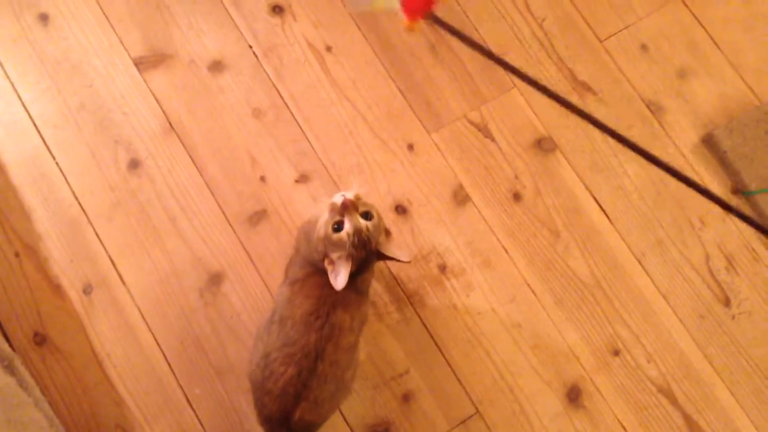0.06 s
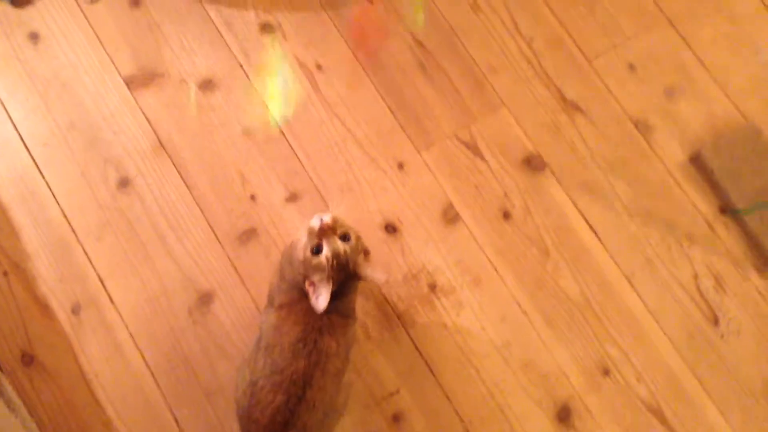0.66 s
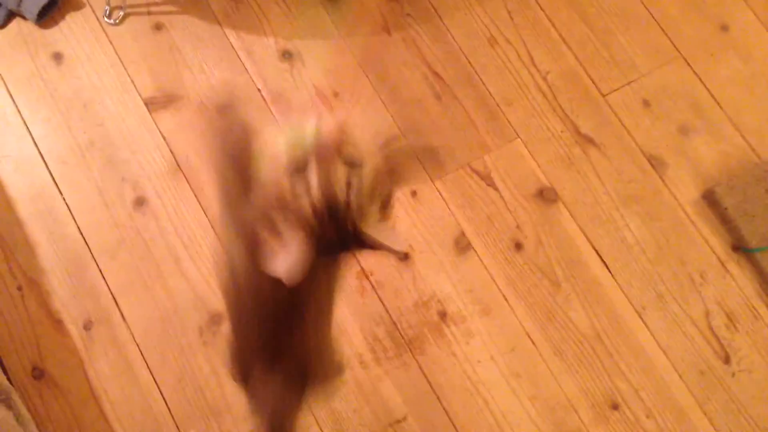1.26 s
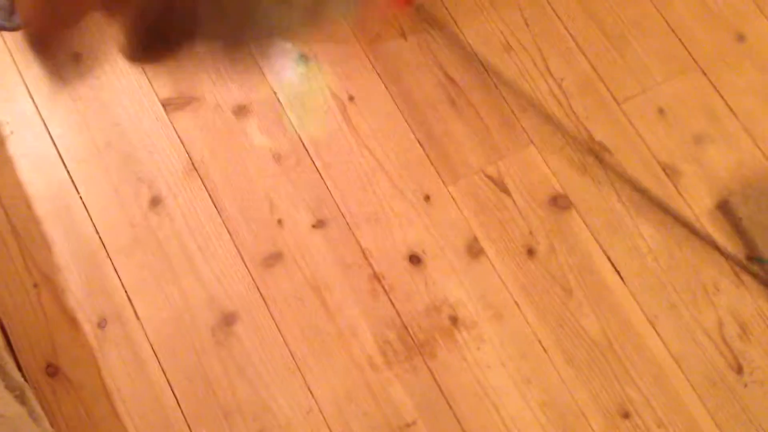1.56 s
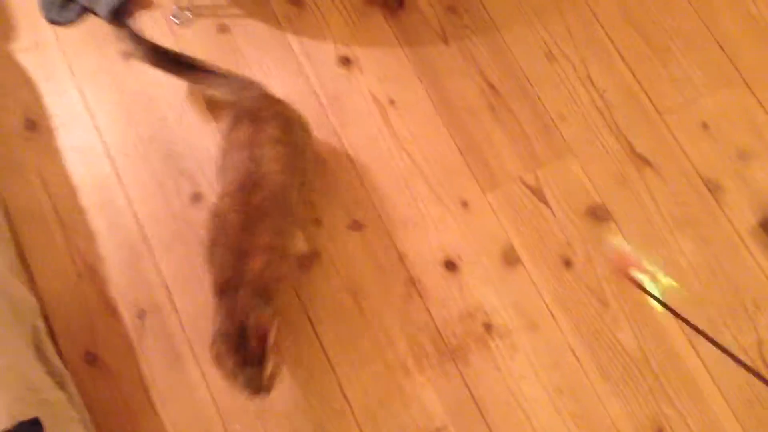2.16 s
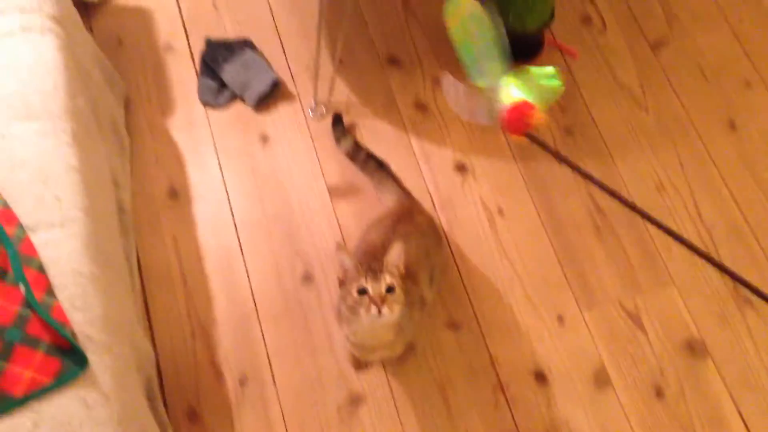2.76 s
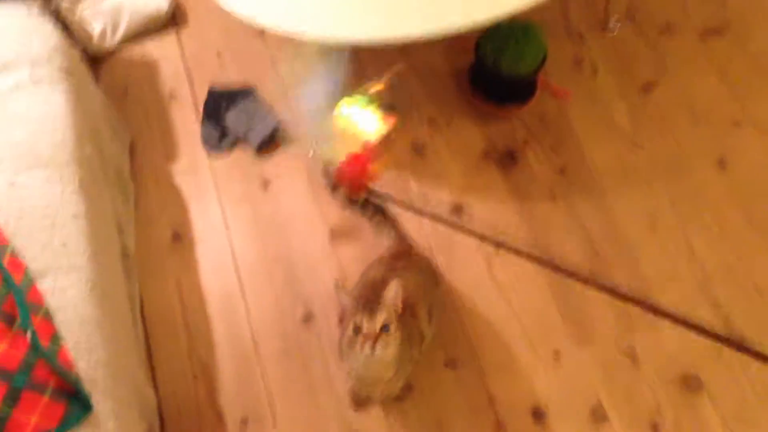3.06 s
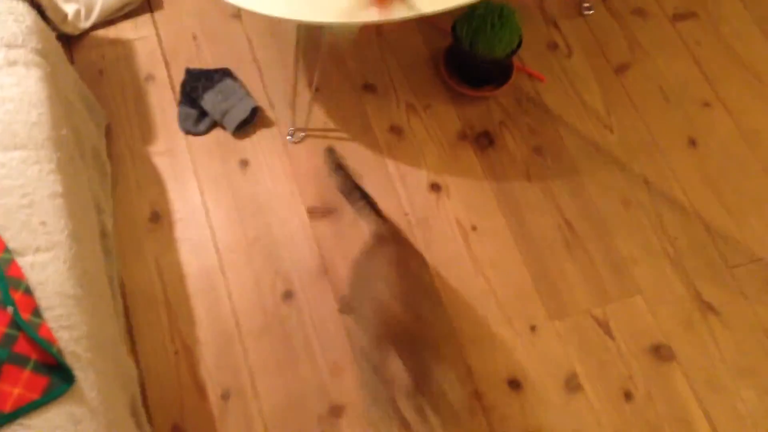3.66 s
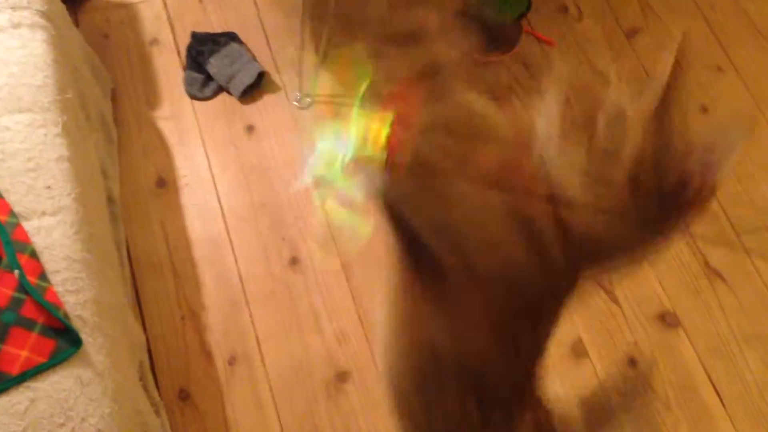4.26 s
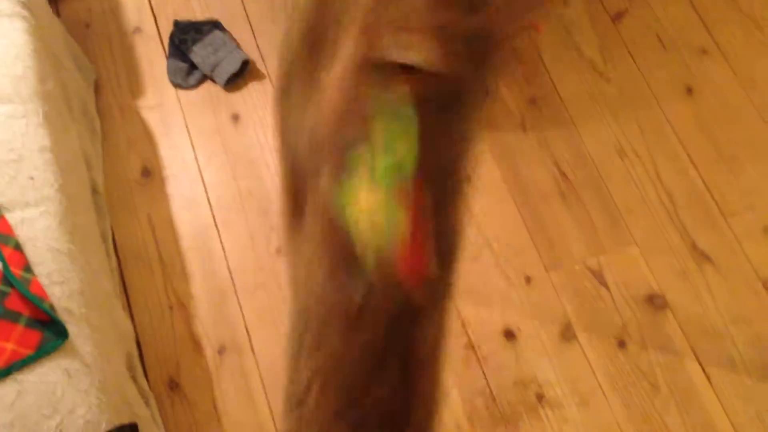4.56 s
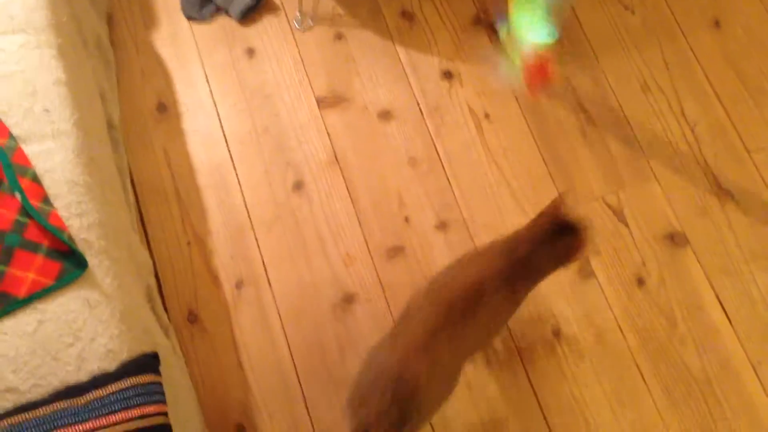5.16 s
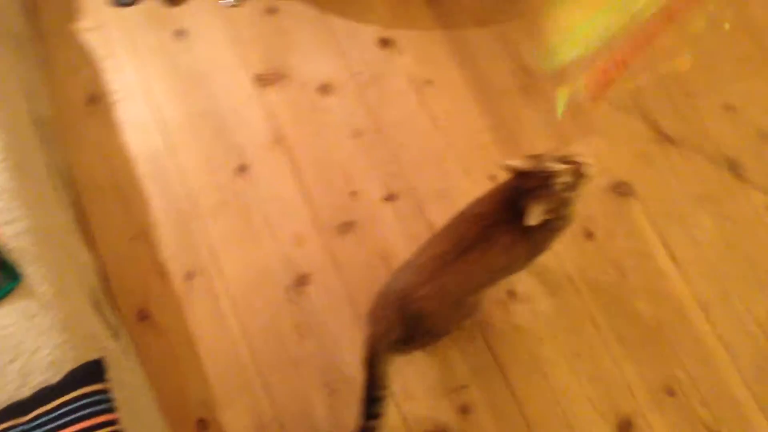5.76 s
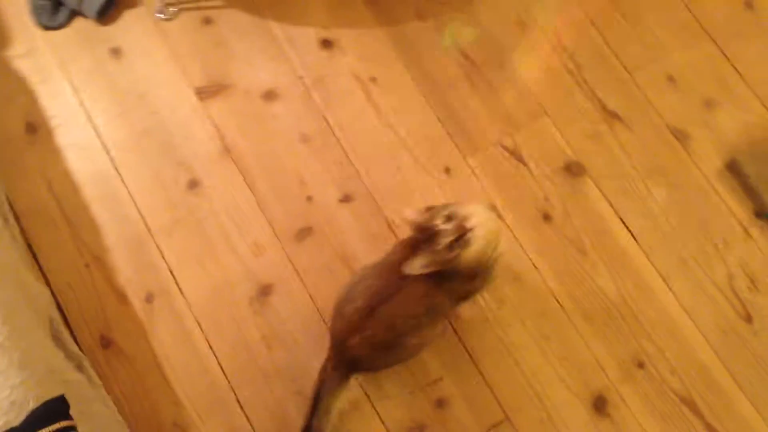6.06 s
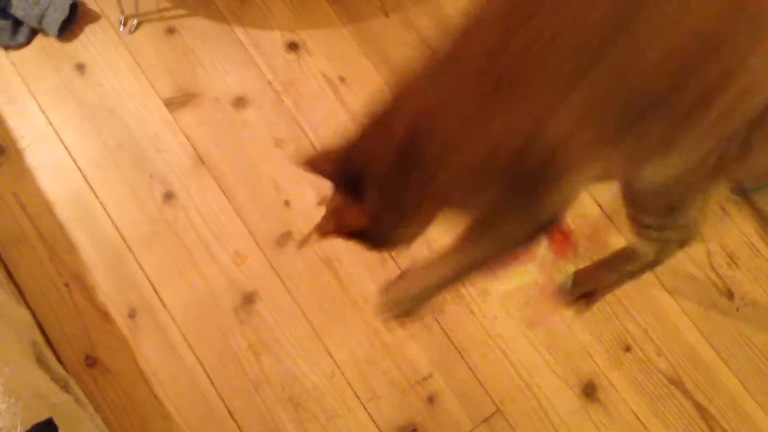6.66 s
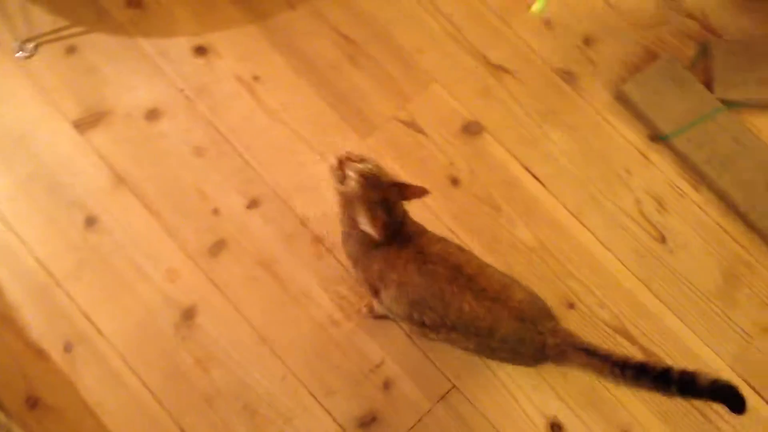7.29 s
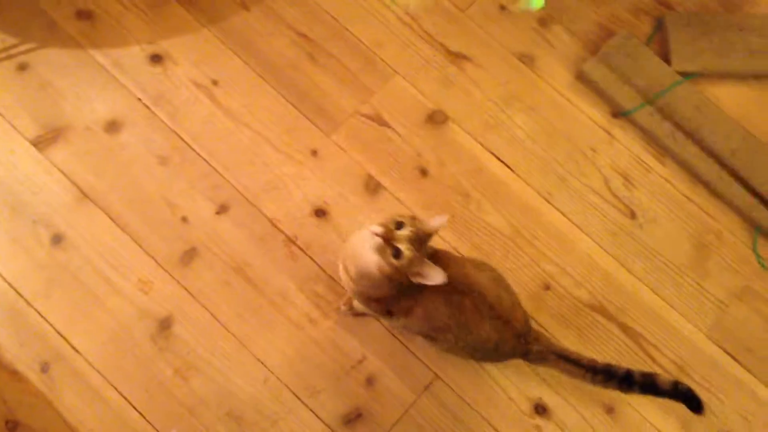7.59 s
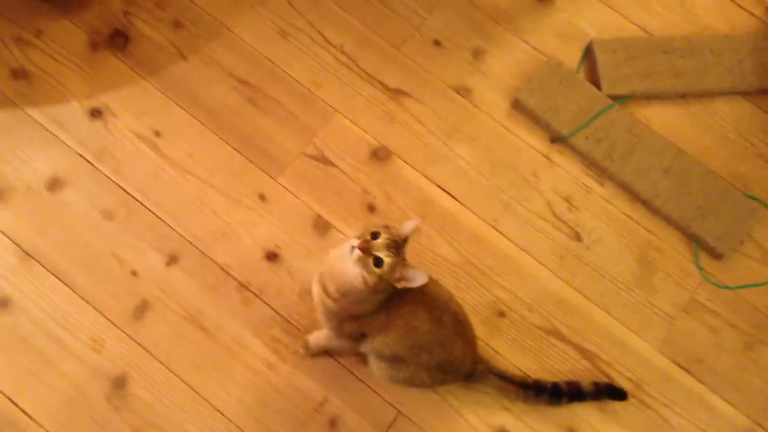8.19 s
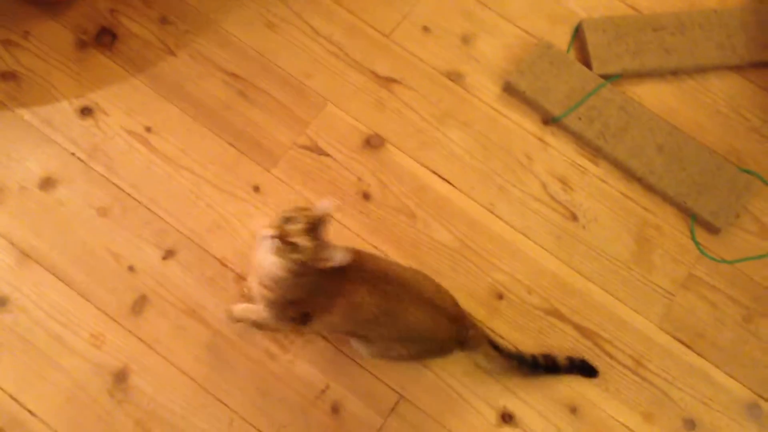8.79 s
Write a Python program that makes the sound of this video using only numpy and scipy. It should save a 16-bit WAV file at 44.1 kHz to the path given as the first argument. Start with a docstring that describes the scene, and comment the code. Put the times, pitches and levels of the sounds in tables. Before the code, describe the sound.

A cat swats at a rustling wand toy in crackly bursts, thumping down onto floorboards three times in a quiet room.

```python
"""A small, faintly humming room with a plank floor; one microphone, close to a cat and a wand toy.
Half a second in, the wand starts to flick: its foil feathers brush, crinkle and snap at each turn.
Near 1.4 s the cat swats them in mid-air with a loud crackle and dull knocks of the toy, then lands
at 2 s, paw after paw, on the booming boards. Two more swats end in landings at 4.8 and 6.9 s.
A last flurry from 8.2 s passes near enough to stir the air at the microphone."""
import sys
import numpy as np
from scipy import signal
from scipy.fft import rfft, irfft, next_fast_len
from scipy.io import wavfile

SR = 44100
rng = np.random.default_rng(int(sys.argv[2]) if len(sys.argv) > 2 else 0)


def generate_wav(signal):
    """Clip the signal to [-1, 1] and save it as 16-bit WAV at the path in sys.argv[1]."""
    frames = np.transpose(np.atleast_2d(signal))
    scaled = np.clip(frames, -1, 1) * 32767
    pcm = np.round(scaled).astype(np.int16)
    wavfile.write(sys.argv[1], SR, pcm)


N = 398223


def amp(db):
    """Decibels to gain."""
    return 10 ** (np.asarray(db) / 20)


def rms(x):
    """Root mean square of a signal."""
    return np.sqrt(np.mean(x ** 2) + 1e-20)


def unit(x):
    """Scale to rms 1."""
    return x / rms(x)


def clock(size):
    """Sample times in seconds."""
    return np.arange(size) / SR


def along(points, hz):
    """(Hz, value) points read on a log frequency axis."""
    point_hz, values = np.transpose(points)
    return np.interp(np.log(hz + 1), np.log(point_hz), values)


def filtered(x, gain):
    """x through the minimum-phase filter that has this gain over frequency."""
    size = 2 * next_fast_len(len(x) // 2 + 4096)
    hz = np.fft.rfftfreq(size, 1 / SR)
    cepstrum = irfft(np.log(np.maximum(gain(hz), 1e-6)))
    cepstrum[1:size // 2] *= 2  # folding onto positive time makes the filter causal
    cepstrum[size // 2 + 1:] = 0
    return irfft(rfft(x, size) * np.exp(rfft(cepstrum)))[:len(x)]


def cushion(hz, hard_hz):
    """Low-pass gain: a padded contact passes little above its hardness frequency."""
    return 1 / np.sqrt(1 + (hz / hard_hz) ** 4)


def add(track, s, sound):
    """Mix a sound into a track from time s on."""
    start = max(round(s * SR), 0)
    part = sound[:max(N - start, 0)]
    track[start:start + len(part)] += part


# The still room at the microphone. Each row: frequency in Hz, relative level in dB.
ROOM_TONE_SPECTRUM = [(15, -54), (25, -23), (79, -12), (119, -16), (140, -8), (160, -3), (281, -8),
                      (482, -13), (871, -19.5), (997, -18), (1490, -24.5), (1750, -25), (2630, -27.5),
                      (14300, -30.5), (15500, -34)]
def room_tone(air_db=-61.5, drone_db=-67, drone_hz=163):
    """Low room noise and microphone hiss, with a narrow drone at a room resonance."""
    air = filtered(rng.standard_normal(N), lambda hz: amp(along(ROOM_TONE_SPECTRUM, hz)))
    drone = filtered(rng.standard_normal(N), lambda hz: 1 / (1 + ((hz - drone_hz) / 16) ** 2))
    return amp(air_db) * unit(air) + amp(drone_db) * unit(drone)


def creases(size, per_second, spread_db):
    """Foil buckles in tiny clicks at random moments and of uneven strength; rms 1."""
    happens = rng.random(size) < per_second / SR
    strength = amp(spread_db * np.clip(rng.standard_normal(size), -2, 2))
    return unit(happens * strength * rng.choice([-1, 1], size))


# The foil's tone from close by. Each row: frequency in Hz, relative level in dB.
FOIL_SPECTRUM = [(40, -7.5), (150, -8.5), (400, -8.5), (750, -10.5), (1050, -6.5), (1400, 0.5), (1900, 3),
                 (2350, 1.5), (3500, -2), (4800, 3), (6500, 2), (8500, -2.5), (12000, -5.5), (15500, -12.5)]
def foil(clicks, bright_db, facet_hz=4500, facet_db=0):
    """The foil radiates the clicks; sharp folds add treble and a flat facet can ring."""
    def colour(hz):
        treble = 1 / (1 + (6000 / (hz + 1)) ** 3)
        facet = 1 / (1 + ((hz - facet_hz) / (0.12 * facet_hz)) ** 2)
        return unit(amp(along(FOIL_SPECTRUM, hz) + bright_db * treble + facet_db * facet))
    return filtered(clicks, colour)


# The wand waved over the cat, one list per bout. Each row: time in seconds, relative level in dB.
WAND_BOUTS = [
    [(0.52, -64.5), (1.108, -48.5), (1.9, -71)],
    [(3.38, -61), (4.302, -54.5), (4.65, -71)],
    [(5.8, -71), (6.174, -51.5), (6.65, -66), (7.1, -68.5), (7.75, -72.5), (8.15, -63)],
    [(8.15, -60), (8.456, -50.5), (9.03, -48)],
]
def brushing(level_db=-7.5):
    """While the wand moves, the feathers slide over each other with a dull, fine crackle."""
    crackle = creases(N, per_second=2200, spread_db=8)
    return amp(level_db) * motion(clock(N)) * foil(crackle, bright_db=-24.5)


def motion(s):
    """Gain that follows the wand's movement at times s; zero while the toy rests."""
    bouts = map(np.transpose, WAND_BOUTS)
    return sum(np.interp(s, times, amp(db), left=0, right=0) for times, db in bouts)


def chance_events(slots, over_db, spread_db):
    """Rows (s, dB): one random event per time slot while the toy moves, louder as it moves faster."""
    place, strength = rng.random((slots, 2)).T
    times = (np.arange(slots) + place) * N / SR / slots
    offsets_db = over_db + spread_db * (2 * strength - 1)
    return [(s, 20 * np.log10(gain) + db)
            for s, gain, db in zip(times, motion(times), offsets_db) if gain > 0]


def pings(swell, per_second, cycles, spread_db):
    """Some creases set a small facet ringing for a few cycles at its own pitch; energy 1."""
    count = 3 + int(per_second * swell.sum() / SR)
    start = rng.choice(len(swell), count, p=swell ** 2 / np.sum(swell ** 2))[:, None]
    hz = rng.uniform(2044, 10220, (count, 1))
    strength = amp(spread_db * np.clip(rng.standard_normal((count, 1)), -2, 2)) * np.sqrt(hz)
    t = clock(400)
    rings = strength * np.sin(2 * np.pi * hz * t) * np.exp(-hz * t / cycles)
    positions = start + np.arange(len(t))
    out = np.bincount(positions.ravel(), rings.ravel(), len(swell))[:len(swell)]
    return out / np.linalg.norm(out)


# The largest facet changes as the toy turns and bends. Each row: time in seconds, pitch in Hz.
FACET_PITCH = [(1.2, 2300), (1.45, 8000), (1.7, 2320), (4.1, 1980), (4.35, 7000), (5.4, 2820), (7.5, 2800),
               (8.3, 3750)]
# Flicks and swats crumple the foil in mid-air, near the microphone.
# Each row: peak time in seconds, level in dB, time scale of the swell in seconds, brightness in dB.
CRUMPLES = [(0.549, -43.5, 0.0086, -12), (0.577, -45, .009, -35), (0.651, -50, 0.011, -37),
            (.72, -44, 0.0083, -17), (0.771, -50, 0.0065, -41), (0.828, -42.5, 0.016, -28),
            (0.93, -39.5, 0.013, -18), (.983, -44, .011, -34), (1.067, -41, .018, -9),
            (1.115, -36.5, 0.014, -13), (1.192, -36.5, 0.015, -25), (1.252, -48.5, 0.011, -3),
            (1.291, -50, 0.013, -27), (1.399, -27.5, 0.009, -2), (1.421, -33, 0.012, -19),
            (1.501, -29, 0.02, -5), (1.548, -43, 0.012, -19), (1.688, -49, .012, -7),
            (1.718, -41, 0.013, 0), (3.422, -55, 0.012, -13), (3.603, -52, .014, -25),
            (3.695, -47.5, 0.018, -28), (3.781, -49.5, 0.0064, -20), (3.863, -45, 0.013, -31),
            (3.958, -46, 0.0095, -22), (4.059, -47.5, 0.023, -24), (4.218, -48, .014, -35),
            (4.278, -39, .027, -6), (4.315, -31, .011, 1), (4.332, -31, 0.01, 0), (4.397, -33, 0.0098, 2),
            (4.418, -33.5, .018, -6), (4.446, -35.5, .014, -12), (4.468, -37.5, .016, -9),
            (5.365, -49.5, .011, -24), (5.579, -53, 0.027, -17), (5.859, -45, 0.018, -15),
            (6.046, -44, 0.03, -10.5), (6.091, -47, .008, -21), (6.144, -37, 0.019, -3),
            (6.22, -42.5, 0.015, -11), (6.242, -37, .01, -12), (6.303, -41, .014, -8),
            (6.321, -36, 0.022, -2), (6.344, -29.5, 0.0082, 8), (6.369, -28, .011, -3),
            (6.414, -32.5, 0.018, -5), (6.693, -50, .01, -8), (6.865, -32.5, 0.027, -3.5),
            (7.092, -48, 0.012, -23), (7.136, -52.5, 0.017, -13), (7.58, -58.5, .014, -33),
            (7.997, -56.5, .02, -41), (8.1, -56, .01, -27), (8.224, -39, 0.016, -26),
            (8.314, -42, 0.017, -10), (8.372, -40.5, 0.0087, -16), (8.407, -42.5, 0.025, -29),
            (8.506, -44.5, 0.03, -16), (8.553, -34, 0.018, -5), (8.578, -30.5, 0.022, -10),
            (8.677, -41, 0.026, -15), (8.719, -42, .011, -27), (8.928, -30.5, .023, -13),
            (9.028, -38, .008, -16)]
def crinkles(ping_db=-6, facet_db=6, scatter_octaves=0.25, flutter_s=0.008, flutter_bright_db=-28):
    """Each crumple is an avalanche of creases that swells and dies; small dull ones flutter between."""
    out, t = np.zeros(N), clock(12000)
    flutter = [(s, db, flutter_s, flutter_bright_db)
               for s, db in chance_events(slots=110, over_db=-0.5, spread_db=3)]
    for s, db, length, bright_db in CRUMPLES + flutter:
        facet_hz = np.interp(s, *np.transpose(FACET_PITCH))
        facet_hz *= 2 ** (scatter_octaves * rng.standard_normal())
        lead = 2 * length
        from_peak = (t - lead) / length
        rise = np.exp(-(from_peak / 0.5) ** 2)
        fall = np.exp(-(np.abs(from_peak) / 0.75) ** 1.4)
        swell = np.where(from_peak < 0, rise, fall)
        clicks = swell * creases(len(t), per_second=5000, spread_db=5.5)
        clicks /= np.linalg.norm(clicks)
        clicks += amp(ping_db) * pings(swell, per_second=350, cycles=8, spread_db=2)
        crumple = unit(foil(clicks, bright_db, facet_hz, facet_db)) * rms(swell)
        add(out, s - lead, amp(db) * room(crumple, wet_db=-9.5, build_s=0.005))
    return out


# The short echo off the nearby walls. Each row: frequency in Hz, seconds to fall by 60 dB.
ROOM_DECAY = [(100, .28), (400, .26), (1500, .23), (4000, .23), (9000, .19), (15000, .15)]
def room(x, wet_db, build_s):
    """x plus the room's echo, drawn afresh because it differs from place to place."""
    hz, t, noise = signal.stft(rng.standard_normal(SR // 3), SR, nperseg=256)
    decay = amp(-60 * t / along(ROOM_DECAY, hz)[:, None])
    tail = signal.istft(noise * decay, SR, nperseg=256)[1]
    tail *= 1 - np.exp(-(clock(len(tail)) / build_s) ** 2)
    echo = signal.fftconvolve(x, tail / np.linalg.norm(tail))[:len(x)]
    return x + amp(wet_db) * echo


# Each tick's brightness is read from its level. Each row: relative level in dB, brightness in dB.
BRIGHTNESS_BY_LEVEL = [(-29, -12), (-39.5, 2), (-20, 10)]
# Sharp ticks near the microphone: foil creases snapping, and a claw tick in the second landing.
# Each row: start in seconds, relative level in dB.
SHARP_TICKS = [(0.5444, -39.5), (0.7061, -45), (.911, -35.5), (.9322, -37.5), (0.9482, -42),
               (0.9797, -42.5), (1.0792, -35.5), (1.116, -45), (1.1532, -43.5), (1.186, -34.5),
               (1.2076, -41.5), (1.2846, -37), (1.382, -39.5), (1.402, -20), (1.428, -28.5),
               (1.5078, -25.5), (1.5283, -27), (1.711, -37), (3.4736, -46), (3.6524, -47), (3.856, -45),
               (3.934, -45), (3.9572, -43), (4.1346, -50.5), (4.2537, -32), (4.3326, -24.5),
               (4.3966, -22.5), (4.4187, -27.5), (4.447, -32.5), (4.8177, -47), (5.4244, -49),
               (5.7006, -47), (5.83, -46), (6.1123, -41), (6.2163, -40), (6.2936, -36), (6.399, -31.5),
               (6.5041, -45.5), (6.5242, -47), (6.853, -32), (7.0178, -45), (7.4487, -49.5), (7.511, -48),
               (8.2196, -40), (8.2593, -42.5), (8.486, -46), (8.5422, -27), (8.668, -39), (8.7476, -46),
               (8.9025, -37.5), (8.9225, -31)]
def ticks(level_db=4, decay_s=0.0018):
    """A stiff crease pops or a claw taps in a millisecond or two; small random ticks fall between."""
    out, t = np.zeros(N), clock(9000)
    fade = np.exp(-t / decay_s)
    small_ticks = chance_events(slots=120, over_db=5, spread_db=4)
    for s, db in SHARP_TICKS + small_ticks:
        bright_db = np.interp(db, *np.transpose(BRIGHTNESS_BY_LEVEL))
        pop = unit(fade * rng.standard_normal(len(t))) * rms(fade)
        add(out, s, amp(db + level_db) * room(foil(pop, bright_db), wet_db=-7, build_s=0.001))
    return out


# The toy is batted or jerked above the floor. Each row: start in seconds, level in dB, hardness in Hz.
TOY_KNOCKS = [(1.3963, -42, 200), (1.5015, -38, 400), (1.7107, -39, 600), (4.332, -45, 500),
              (4.418, -46, 600), (6.367, -47, 700), (8.536, -47, 160)]
def toy_knocks(decay_s=0.0052):
    """The light toy knocks and flaps dully, without ringing."""
    out, t = np.zeros(N), clock(9000)
    fade = np.exp(-t / decay_s)
    for s, db, hard_hz in TOY_KNOCKS:
        burst = fade * rng.standard_normal(len(t))
        knock = filtered(burst, lambda hz: cushion(hz, hard_hz) * hz / (hz + 70))
        add(out, s, amp(db) * room(unit(knock) * rms(fade), wet_db=-7, build_s=0.0021))
    return out


# The modes of the plank floor under the cat.
# Each row: frequency in Hz, relative level in dB, seconds to fall by 60 dB.
PLANK_MODES = [(56.8, -16.0, 0.25), (68.7, -26.2, 0.25), (118.5, -8.7, 0.22), (132.2, -3.3, 0.2),
               (156.1, -0.2, 0.19), (199.1, -11.2, 0.19), (233.7, -12.0, 0.16), (273.5, -11.3, 0.24),
               (347.8, -10.1, 0.18), (403.4, -13.7, 0.15), (485.2, -5.3, 0.1), (560.5, -15.7, 0.14),
               (635.0, -13.9, 0.1), (736.5, -19.3, 0.1), (832.7, -13.7, 0.09)]
# Down on the boards, below the toy: three landings, and two soft steps near 3.9 s.
# Each row: start in seconds, relative push in dB, hardness in Hz, slap level in dB.
PAW_FALLS = [(1.990, -25, 2000, -37), (1.9952, -0.5, 900, -32), (2.007, -11, 1500, -26),
             (2.021, -10, 450, -30), (2.0634, -16, 295, -29.5), (3.918, -24, 100, -50),
             (3.938, -25, 110, -51), (4.779, -21, 1370, -36.5), (4.7894, -10.5, 480, -38),
             (4.81, -27, 2140, -37), (4.815, -5.5, 595, -35), (4.8325, -19, 250, -38),
             (4.839, -8, 250, -32), (4.8586, -11, 396, -33.5), (6.878, -24, 1920, -31.5),
             (6.883, -10, 537, -33.5), (6.8965, -5.5, 240, -29), (6.913, -14, 440, -32.5),
             (6.968, -17.5, 1000, -39), (7.003, -11.5, 214, -38.5), (7.049, -29, 170, -48)]
def paws(ring_db=-22, thud_db=-18, slap_decay_s=0.0037, wood_hz=1700, plank_hz=150,
         second_push_s=0.0066, second_push_db=-9, second_push_hardness=0.61):
    """Each padded paw slaps the planks and pushes them into their modes twice, the second time softer."""
    out, t = np.zeros(N), clock(20000)
    ring = sum(amp(db - 60 * t / t60) * np.cos(2 * np.pi * hz * t) for hz, db, t60 in PLANK_MODES)
    thud = np.cos(2 * np.pi * 190 * t) * np.exp(-t / 0.0012)
    floor = amp(ring_db) * ring + amp(thud_db) * thud
    fade = np.exp(-t / slap_decay_s)
    second_pushes = [(s + second_push_s, push_db + second_push_db,
                      hard_hz * second_push_hardness, slap_db + second_push_db)
                     for s, push_db, hard_hz, slap_db in PAW_FALLS]
    for s, push_db, hard_hz, slap_db in PAW_FALLS + second_pushes:
        def pad(hz):
            return cushion(hz, hard_hz) * cushion(hz, wood_hz)

        def slap_colour(hz):
            """The slap gathers around the hardness frequency; a small contact moves little bass."""
            bass_cut = hz / (hz + hard_hz / 2) * cushion(plank_hz, hz + 1)
            return pad(hz) * cushion(hz, 1.39 * hard_hz) * bass_cut

        boom = amp(push_db) * filtered(floor, pad)
        slap = filtered(fade * rng.standard_normal(len(t)), slap_colour)
        slap = amp(slap_db) * unit(slap) * rms(fade)
        add(out, s, boom + room(slap, wet_db=1, build_s=0.007))
    return out


# The last swings pass right by the microphone. Each row: time in seconds, level in dB.
CLOSE_SWINGS = [(8.45, -85), (8.55, -61), (8.65, -60.5), (8.82, -64), (9.03, -63)]
def draught():
    """Air stirred by the toy rumbles softly on the microphone."""
    times, db = np.transpose(CLOSE_SWINGS)
    air = filtered(rng.standard_normal(N), lambda hz: cushion(hz, 117) * hz / (hz + 60))
    return unit(air) * np.interp(clock(N), times, amp(db), left=0)


# A notch in the device behind the microphone. Each row: time in seconds, share of the band lost, 0 to 1.
NOTCH_DEPTH = [(1.3, .88), (1.5, 0.73), (4.1, 0.78), (4.3, 0.66), (5.4, 0.42), (7.5, 0.63), (8.2, 0.8)]
def device_notch(x, notch_hz=2810, half_width_hz=260):
    size = next_fast_len(N + SR // 2)
    hz = np.fft.rfftfreq(size, 1 / SR)
    band_gain = np.exp(-((hz - notch_hz) / half_width_hz) ** 6)
    band = irfft(rfft(x, size) * band_gain, size)[:N]
    depth = np.interp(clock(N), *np.transpose(NOTCH_DEPTH))
    return x - depth * band


def scene():
    """Toy, cat and room at one microphone."""
    play = crinkles() + ticks() + brushing() + toy_knocks() + draught() + paws()
    return (device_notch(play) + room_tone())[None]


def record(dry, bass_hz=42, top_hz=15700):
    """The microphone sheds the deepest bass and keeps nothing above its band limit."""
    size = next_fast_len(N + SR // 2)
    hz = np.fft.rfftfreq(size, 1 / SR)
    low_cut = signal.butter(2, bass_hz, "highpass", fs=SR, output="sos")
    lean = signal.sosfilt(low_cut, dry)
    band_limit = 1 / (1 + (hz / top_hz) ** 160)
    return irfft(rfft(lean, size) * band_limit, size)[:, :N]


dry = scene()
out = record(dry)
generate_wav(out)
```